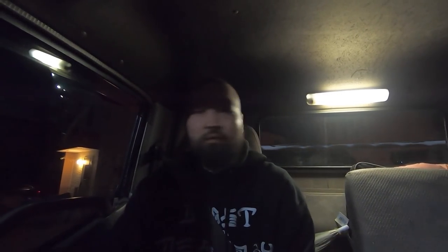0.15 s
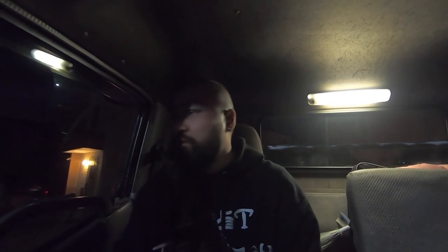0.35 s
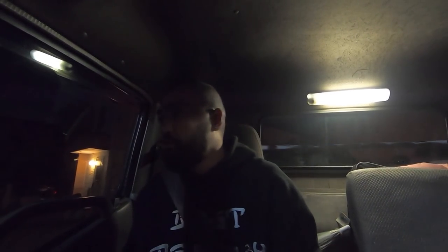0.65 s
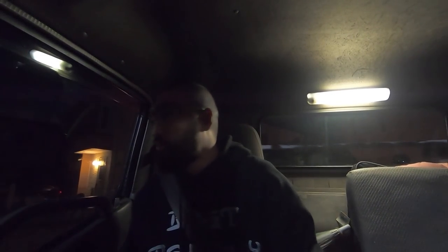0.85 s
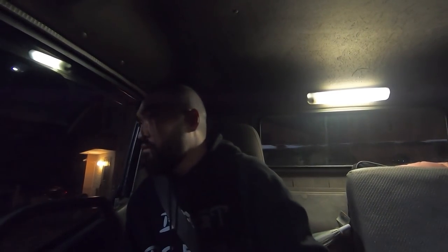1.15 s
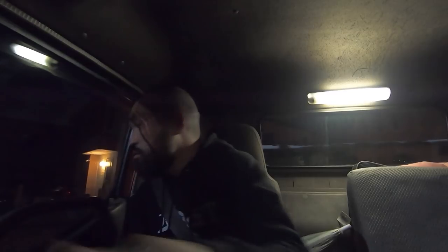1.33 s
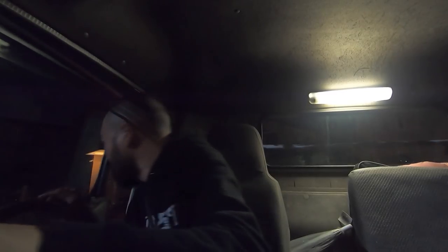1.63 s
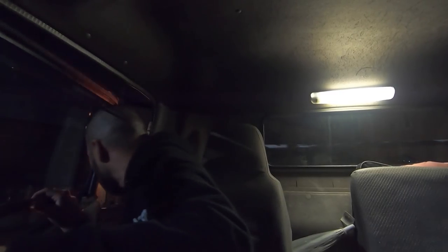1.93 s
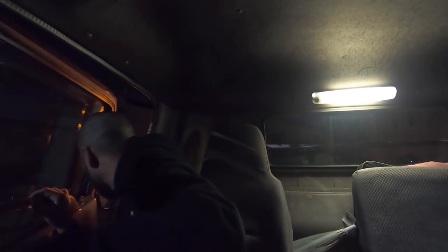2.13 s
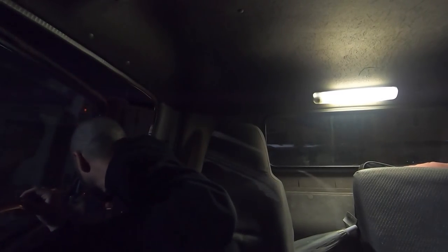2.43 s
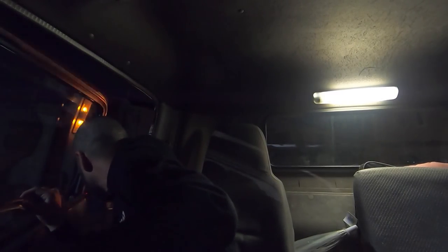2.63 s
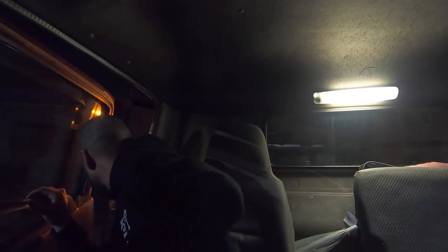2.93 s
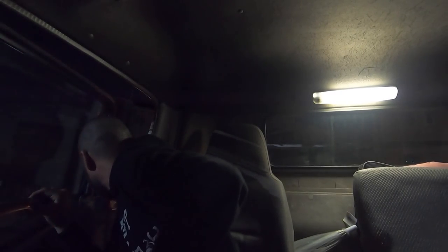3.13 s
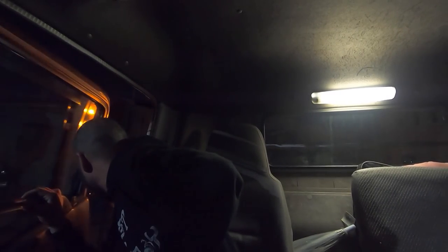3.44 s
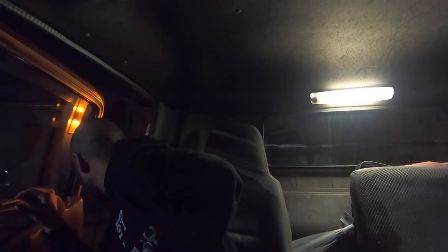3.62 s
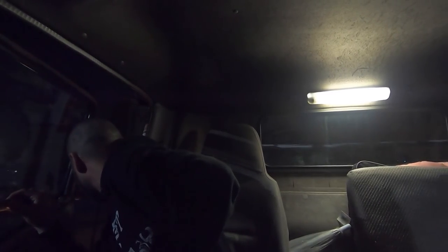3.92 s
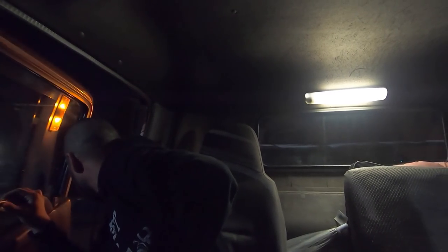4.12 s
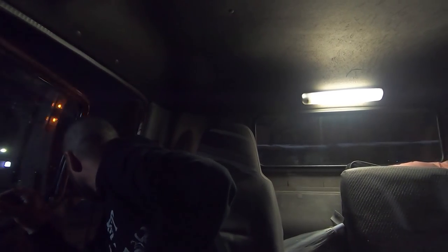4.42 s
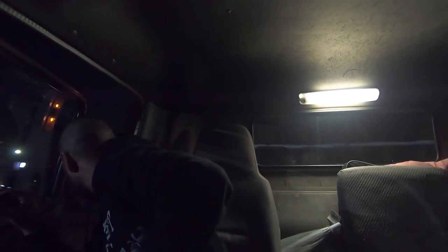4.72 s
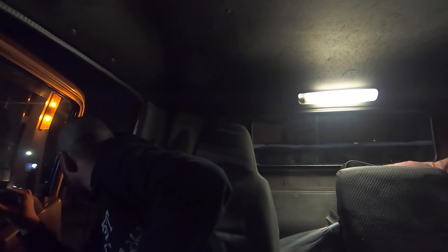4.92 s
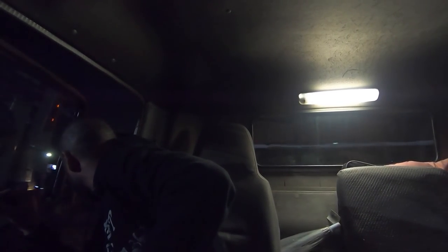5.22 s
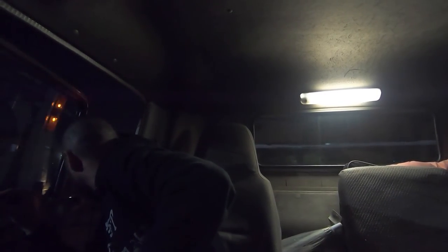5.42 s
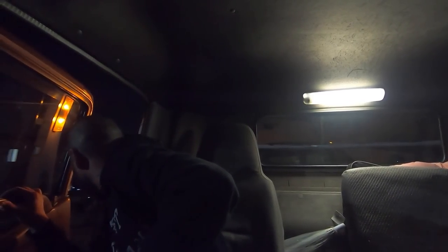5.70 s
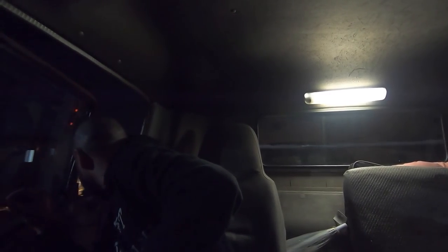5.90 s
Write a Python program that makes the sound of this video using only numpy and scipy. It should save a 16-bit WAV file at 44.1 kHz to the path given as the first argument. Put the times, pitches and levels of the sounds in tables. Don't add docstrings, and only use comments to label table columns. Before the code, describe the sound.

Close inside a truck cab, a diesel engine booms low and muffled while a flasher relay ticks and tocks evenly. The driver fumbles the door handle, the latch clunks and the door skin thumps. With the door open, clatter and valve hiss enter from the left, the revs rise and settle, loose trim rattles, and the engine finally sags into hard separate knocks.

```python
import sys
import numpy as np
from scipy import signal
from scipy.fft import rfft, irfft, next_fast_len
from scipy.io import wavfile
from scipy.ndimage import uniform_filter1d

SR = 44100
rng = np.random.default_rng(int(sys.argv[2]) if len(sys.argv) > 2 else 0)


def output_pcm(signal):
    pcm = np.clip(np.atleast_2d(signal).T, -1, 1) * 32767
    wavfile.write(sys.argv[1], SR, np.round(pcm).astype(np.int16))


def invert_db(level):
    return 10 ** (np.asarray(level, dtype=float) / 20)


N = 267246


def curve(table):
    s, *columns = np.transpose(table)
    return [np.interp(np.arange(N) / SR, s, column) for column in columns]


def over(table, hz, order=1):
    rows = np.array(table, float)
    return np.interp(np.log(hz + 1e-9), np.log(rows[:, 0]), rows[:, order])


def walk(rate):
    k = int(SR / rate)
    held = np.repeat(rng.standard_normal(N // k + 3), k)
    slewed = uniform_filter1d(uniform_filter1d(held, k), k)
    return 1.245 * slewed[k:k + N]


def add(out, s, sound):
    i = int(s * SR)
    out[:, i:i + sound.shape[1]] += sound[:, :N - i]


def lean(pan_db):
    return invert_db(np.array([[.5], [-.5]]) * pan_db)


# (f/Hz, left-right likeness -1..1, left minus right level/dB)
PORTS = [(30, 0.81, 10.5), (71.4, 0.88, -6.5), (200, 0.98, -1), (393, 0.93, -3.5), (674, 0.23, -1.5),
         (1280, 0.14, -10.5), (2400, 0.49, -3.5), (4400, 0.42, -2.5), (8000, 0.0052, -3.5),
         (15000, -0.077, 1.5)]


def at_ports(a, b, gain, balance=0.78):
    hz = np.arange(len(a) // 2 + 1) * SR / len(a)
    like = np.clip(over(PORTS, hz), -1, 1)
    tilt = invert_db(balance * over(PORTS, hz, order=2) / 2)
    same = rfft(a) * np.sqrt(1 + like)
    other = rfft(b) * np.sqrt(1 - like)
    ports = np.array([(same + other) * tilt, (same - other) / tilt])
    out = irfft(ports * gain(hz), len(a))
    return out / np.sqrt(np.mean(out.mean(axis=0) ** 2))


# (f/Hz, width f/Hz, level/dB)
RESONANCES = [(165, 29.6, 7.5), (212, 70, 4.5), (321, 17, 9), (380.4, 15, 6.5), (643, 7.5, -1.5),
              (1033, 26, 9.5), (1420, 53, -0.5), (2060, 90, 0), (2626, 90, 4), (3900, 59, 0),
              (5500, 180, 1.5), (6480, 54, 4.5)]


def colour(table, lift=0.98):
    def gain(hz):
        peaks_db = sum(db / (1 + (2 * (hz - f) / w) ** 2) for f, w, db in RESONANCES)
        inside = (hz > table[0][0]) * (hz < table[-1][0])
        return invert_db(over(table, hz) + lift * peaks_db) * inside
    return gain


def steady(table):
    return at_ports(*rng.standard_normal((2, next_fast_len(N))), colour(table, lift=0))[:, :N]


def burst(table, rise, hold, t60, tail_db):
    t = np.arange(8192) / SR - .02
    noise = at_ports(*rng.standard_normal((2, len(t))), colour(table, lift=0), balance=0)
    decay = invert_db(-60 * np.maximum(t - hold, 0) / t60)
    tail = invert_db(tail_db - 60 * t / 0.2)
    fall = (decay + tail) / (1 + invert_db(tail_db))
    return noise * np.where(t < 0, np.exp(-(t / rise) ** 2), fall)


# (f/Hz, level/dB per Hz)
SELF_NOISE = [(4000, -6), (9000, 0), (11000, -7), (13000, -11), (15000, -15), (15800, -30)]


def self_noise():
    return steady(SELF_NOISE) * invert_db(-88 + 1.5 * walk(8))


# (t/s, peak level/dB, body f/Hz,
# highs over body level/dB)
RATTLES_AND_KNOCKS = [(1.805, -28, 847, -23), (1.8045, -36, 1630, -18), (1.806, -39, 2790, -20), (1.982, -31, 1450, -22),
                      (2.176, -35.5, 1800, -20), (2.257, -33, 864, -25), (2.331, -35, 1550, -17), (2.369, -33, 1000, -19),
                      (2.459, -37, 1785, -12), (2.589, -34, 1410, -22), (2.719, -38.5, 1050, -10), (2.83, -33, 553, -40),
                      (2.859, -41, 1650, -7), (3.453, -33, 840, -21), (3.932, -35.5, 716, -19), (4.264, -40, 1350, -2),
                      (4.59, -37, 1420, -20), (4.909, -43, 1500, -14), (5.529, -42, 1320, -12), (5.673, -36, 890, -15.5),
                      (5.702, -33, 1040, -16), (5.946, -38, 1500, -23), (6.0, -40, 1460, -20), (6.043, -39, 800, -21)]
# (t/s, peak level/dB, body f/Hz, highs over body level/dB)
HANDLE = [(.514, -32, 1520, -30), (.516, -35.5, 880, -26), (0.678, -36, 844, -28), (0.908, -39, 1170, -28),
          (1.026, -37.5, 810, -23.5), (1.091, -38.5, 810, -16), (1.127, -32.5, 1620, -15),
          (1.145, -32.5, 1470, -15), (1.169, -40, 1510, -15), (1.184, -35, 1700, -17),
          (1.2065, -42, 2900, -16), (1.537, -31.5, 1130, -22), (1.541, -30, 596, -36)]


def panel_knocks(rows, pan_db):
    out = np.zeros((2, N))
    t = np.maximum(np.arange(8192) / SR - .019, 0)
    ring = (1 - np.exp(-t / 0.0018)) * invert_db(-2.5 - 60 * t / 0.067)
    for s, db, hz, high_db in rows:
        table = [(200, -30), (0.64 * hz, -14), (hz, 0), (min(1.31 * hz, 4200), -11),
                 (min(1.7 * hz, 4350), 0.67 * high_db - 1), (4500, high_db - 2.5),
                 (7000, high_db - 6.5), (9500, high_db - 10), (11000, high_db - 27.0), (16000, high_db - 46)]
        crack = burst(table, 0.0011, 0.00059, 0.064, -11)
        tone = ring * np.sin(2 * np.pi * hz * t)
        add(out, s - .019, (crack + tone) * invert_db(db - 9.0) * lean(pan_db))
    return out


# (t/s, peak level/dB)
TICKS = [(0.2578, -35), (0.9542, -35.5), (1.6506, -36.5), (2.3461, -36.5), (3.045, -37.5), (3.7439, -36.5),
         (4.4433, -37.5), (5.1437, -38.5), (5.8396, -37.5)]
# (t/s, peak level/dB)
TOCKS = [(0.6135, -34), (1.3084, -36.5), (2.0033, -34.5), (2.7057, -38), (3.4042, -36), (4.1021, -35.5),
         (4.8025, -37), (5.5004, -37.5)]
# (f/Hz, level/dB per Hz)
TICK_COLOUR = [(710, -36), (1200, -3), (1520, -20), (1830, -8), (2790, -15.5), (3020, -7.5), (3460, -6.5),
               (4010, -11), (4420, -11), (5700, -22), (6110, -14), (7080, -24.5), (7960, -10), (12500, -36),
               (16200, -58), (22000, -120)]
# (f/Hz, level/dB per Hz)
TOCK_COLOUR = [(1290, -37), (2200, -18), (2700, -14.5), (3030, -4), (3580, -3.5), (3910, -11), (4230, -6.5),
               (4620, -19), (5080, -8), (5580, -20), (6550, -9.5), (7190, -21), (8820, -12), (12500, -40),
               (16200, -60), (22000, -120)]


def relay(times, table, hold, rings):
    out = np.zeros((2, N))
    click = burst(table, 0.0016, hold, 0.058, -16.0)
    t = np.maximum(np.arange(click.shape[1]) / SR - .019, 0)
    for hz, ring_db, t60 in rings:
        swell = 1 - np.exp(-t / 0.0009)
        click = click + swell * invert_db(ring_db - 60 * t / t60) * np.sin(2 * np.pi * hz * t)
    for s, db in times:
        add(out, s - .019, click * invert_db(db - 8.0))
    return out


def flasher():
    ticks = relay(TICKS, TICK_COLOUR, 0.0031, [(3445, 11.5, 0.03), (2060, -11, 0.26)])
    tocks = relay(TOCKS, TOCK_COLOUR, 0.0038, [(3496, 12, 0.03), (3110, -6, .06), (5120, -10, .04)])
    return ticks + tocks


# (t/s of the peak, peak level/dB, rise t/s, hold t/s, t60 t/s)
LATCH = [
    (1.22, -21.5, 0.0057, 0.0052, 0.13),
    (1.271, -21, 0.0035, 0.007, 0.055),
    (1.257, -25, 0.0041, 0.0082, 0.059),
    (1.4105, -16, 0.00068, 0.012, 0.051),
]
# (f/Hz, level/dB per Hz)
LATCH_COLOURS = [
    [(260, -24), (450, -7), (617, 0.5), (919, -12), (1050, -2.5), (1310, -14), (1450, -6), (2150, -29),
     (2510, -13), (3890, -32.5), (7840, -37), (12000, -57), (15600, -88), (22000, -120)],
    [(260, -24), (450, 1), (495, -3), (1280, -7), (1410, -17), (1530, -11), (1900, -7), (2070, -17),
     (2580, -13.5), (3300, -27), (9370, -32.5), (12000, -59), (15600, -86), (22000, -120)],
    [(260, -29), (450, -6), (1280, -3), (2840, -10.5), (3490, -34), (3890, -22), (12000, -41), (15600, -76),
     (22000, -120)],
    [(290, -31), (500, -18), (659, 1), (1020, -6.5), (1360, -16.5), (1620, -8.5), (2040, -6), (2430, -12),
     (2690, -10), (2980, -16), (3810, -15), (5090, -19), (6510, -13), (8700, -15.5), (12500, -34),
     (16200, -47)],
]


def latch():
    out = np.zeros((2, N))
    for (s, db, rise, hold, t60), table in zip(LATCH, LATCH_COLOURS):
        add(out, s - .02, burst(table, rise, hold, t60, -13) * invert_db(db - 6.5) * lean(-3))
    return out


# (t/s, peak level/dB, t60
# t/s)
STRIKES = [(1.2225, -22, .02), (1.2668, -17, 0.028), (1.403, -30, .04), (1.4145, -18.5, .015),
           (1.432, -28, .03), (5.952, -37, .09), (6.002, -36, .09), (6.046, -36, .09)]
# (f/Hz, level/dB per Hz)
STRIKE_COLOUR = [(400, -18), (900, 0), (1900, 0), (2600, -6), (3800, -16), (8000, -19.5), (12000, -38),
                 (16200, -55)]


def strikes():
    out = np.zeros((2, N))
    for s, db, t60 in STRIKES:
        add(out, s - .02, burst(STRIKE_COLOUR, 0.00037, 0.00073, t60, -21) * invert_db(db - 7.0))
    return out


# (t/s of the peak, peak level/dB, f/Hz, t60 t/s, cycles to swell)
THUMPS = [(1.5, -17, 15, .25, 0.71), (1.2338, -7, 207.6, 0.06, 2.4), (1.2245, -15, 134, 0.11, 1.8),
          (1.238, -26, 430, .15, 2.5), (1.235, -30, 1230, .06, 4), (1.298, -31, 780, .05, 2.5),
          (1.312, -33, 620, .06, 2.5), (1.235, -20.5, 110, 0.34, 1.6), (1.256, -19.5, 136, 0.05, 0.54),
          (1.276, -13.5, 138, 0.097, 0.82), (1.4, -20, 222, 0.075, 1.5), (1.277, -16, 333, 0.053, 1.7),
          (1.226, -17.5, 350, 0.06, 1.4), (1.234, -22, 618, 0.047, 2), (1.271, -30, 540, 0.17, 0.97),
          (1.305, -23.5, 130, 0.22, 1.5), (1.427, -18.5, 266, 0.076, 1.1), (1.415, -24.5, 602, .05, 1.2),
          (1.422, -23, 434, 0.07, 1.2), (1.462, -22, 129, 0.14, 2.1), (1.434, -25, 330, .12, 1.5),
          (1.811, -29, 400, .06, 1.5), (.289, -18, 39, 0.17, 1.1), (.47, -20.5, 49, 0.12, 2.2)]


def thumps():
    t = np.arange(14000) / SR - .08
    out = np.zeros((2, N))
    for s, db, hz, t60, cycles in THUMPS:
        shape = np.where(t < 0, np.exp(-(t * hz / cycles) ** 2), invert_db(-60 * t / t60))
        tone = shape * invert_db(db) * np.cos(2 * np.pi * hz * t)
        add(out, s + t[0], np.array([[.95], [1.05]]) * tone)
    return out


# (t/s, extra level/dB)
HARD = [(1.849, 1.5), (1.897, 2), (2.028, 4.5), (2.0704, 5.5), (2.2954, 6), (2.395, 3), (2.483, 2.5),
        (2.526, 2), (2.9285, 1.5), (3.6139, 2), (3.771, 2), (3.9776, 2.5), (4.0559, 2.5), (4.1781, 2),
        (4.3428, 3), (4.4316, 3.5), (4.5069, 2), (4.591, 1.5), (4.6735, 1.5), (4.9085, 1.5), (4.9863, 1),
        (5.2602, 2), (5.3355, 2), (5.4457, 2), (5.893, 2.5), (5.946, 6.5), (6.0, 8), (6.042, 6)]


def hard_firings():
    rise_s, fall_s = 0.0015, 0.016
    t = np.arange(-500, 6000) / SR
    shape = np.exp(np.where(t < 0, t / rise_s, -t / fall_s))
    out = np.zeros((1, N))
    for s, db in HARD:
        add(out, s + t[0], db * shape[None])
    return out[0]


# (t/s, level/dB)
SUMP_LEVEL = [(0, -75), (1.45, -72), (1.65, -57), (2.1, -53), (2.17, -60), (2.3, -52), (2.6, -56),
              (3.3, -57), (3.8, -62), (6.06, -63)]
# (f/Hz, level/dB per Hz)
SUMP_COLOUR = [(940, -30), (1015, -12), (1046, 0), (1080, -12), (1200, -30), (1480, -18), (1580, -8),
               (1680, -18), (1800, -34)]


def sump():
    return steady(SUMP_COLOUR) * invert_db(curve(SUMP_LEVEL)[0] + .8 * hard_firings() + 2.5 * walk(20))


CYLINDER_DB = [-3, -5.5, -5, -6.5]


def knocking(turns, sharp, width):
    cycle = np.floor(turns + .5).astype(int)
    size = invert_db(np.array(CYLINDER_DB)[cycle % 4] + 1.6 * rng.standard_normal(N // 500)[cycle])
    jitter = 0.024 * rng.standard_normal(N // 500)[cycle]
    place = turns + 0.13 - np.floor(turns + .5) + jitter
    pulse = np.exp(-np.where(place < 0, place / -.09, place / width))
    return 1 - sharp + 1.85 * sharp * uniform_filter1d(size * pulse, size=220)


def firing_noise(table, turns, sharp, width, db, flicker_db, rate, hard):
    blows = knocking(turns, np.clip(sharp, 0, .95), width) * rng.standard_normal((2, N))
    padded = np.pad(blows, ((0, 0), (0, next_fast_len(N) - N)))
    ringing = at_ports(*padded, colour(table))[:, :N]
    return ringing * invert_db(db + flicker_db * walk(rate) + hard * hard_firings())


# (f/Hz, level/dB per Hz)
HISS = [(2060, -12), (3500, -5), (3820, -6.5), (5380, -9.5), (6520, -7), (7960, -7), (9190, -10),
        (9540, -12), (10200, -20), (11600, -26.5), (14700, -35), (15700, -43)]


def hiss(turns, sharp, door_db):
    return firing_noise(HISS, turns, 1.1 * sharp, .3, -54 + door_db, 1.2, 12, .35)


# (f/Hz, level/dB per Hz)
COVERS = [(500, -33.5), (720, -1.5), (800, -18), (860, -11), (990, -24.5), (1045, -3), (1100, -18),
          (1420, 3), (1500, -3.5), (1580, 1), (1690, -4), (1800, -19.5), (2080, -9.5), (2600, -35.5)]


def covers(turns, sharp, door_db):
    return firing_noise(COVERS, turns, 1.4 * sharp, .26, -49 + door_db, 1.2, 9, 1.2)


# (f/Hz, level/dB per Hz)
CLATTER = [(240, -31), (400, 0), (449, -7), (637, -9.5), (795, -9.5), (856, -6.5), (951, -12), (1020, -12),
           (1190, -11), (1410, -15.5), (1700, -13), (1850, -16), (2260, -19.5), (3530, -25), (5000, -35.5),
           (6500, -64), (11000, -120)]


def clatter(turns, sharp, door_db, rev_db):
    db = -43.5 + 0.6 * door_db + 0.21 * rev_db
    return firing_noise(CLATTER, turns, .8 * sharp, .3, db, 1.2, 14, .9)


# (f/Hz, level/dB per Hz)
RUMBLE = [(8.2, -40), (14, -9), (32, 1.5), (66, -9), (90, -8.5), (113, -10), (160, -17.5), (194, -19.5),
          (322, -23), (364, -31.5), (448, -28), (900, -39), (1170, -75.5), (1980, -120)]


def rumble(turns, sharp, door_db, rev_db):
    db = -31 + 0.015 * door_db + rev_db
    return firing_noise(RUMBLE, turns, .3 * sharp, .4, db, 1.8, 9, .1)


# (t/s, firing rate f/Hz)
SPEED = [(0, 22.36), (1, 21.2), (1.6, 20.95), (2, 22.2), (2.25, 26.76), (2.45, 31.83), (2.7, 29.53),
         (3, 27.77), (3.4, 25.93), (3.8, 24.58), (4.3, 24.1), (4.8, 24.98), (5.2, 26.05), (5.6, 26.61),
         (5.72, 25.95), (5.9, 20.47), (6.06, 20.56)]


def firing_rate():
    return curve(SPEED)[0]


# (t/s, cab boom at the firing rate level/dB)
BOOM = [(0.0, -30), (0.05, -28.5), (1.01, -34.5), (1.25, -25), (1.28, -34), (1.62, -34), (1.65, -27),
        (2.55, -16.5), (3.19, -27), (3.39, -15.5), (3.56, -23), (4.72, -22.5), (4.84, -45), (4.94, -19.5),
        (5.69, -19), (5.94, -30.5), (5.99, -23.5), (6.06, -30)]
# (order, f/Hz, width f/Hz, level/dB at the centre, level/dB gained by the open door)
CAB_MODES = [(2, 46.1, 9.4, -27, 4), (4, 98, 6.9, -31, -6)]
# (t/s, length t/s, boom level/dB, second order level/dB, fourth order level/dB)
ROCKING = [(.6, .06, -3, -2, -1), (1.42, .06, -7, 1, -2), (1.997, 0.098, 0.5, 3, -8),
           (2.217, 0.059, -2.1, -10, 1), (2.43, 0.032, -2.5, 0.1, 7), (2.51, 0.032, 2.5, -2, -1),
           (2.917, 0.045, 5, -3, 0.1), (3.5, 0.047, 1.5, 1, -4), (3.62, 0.05, -2.5, 2, 1),
           (3.8, .05, 3, 1, -2.7), (4.222, 0.032, -0.5, -0.5, -3.5), (4.295, .05, 3.5, 2, -1.5),
           (4.36, .05, -5.5, -4, -13), (4.55, 0.037, 0.5, -10, 2.5), (4.688, .04, 5, -5, 2.1),
           (4.78, .05, -1, -12, 0.5), (5.074, .05, 1.5, -3, -11), (5.2, 0.034, -1, 2, 4),
           (5.37, 0.041, -1.2, -6, -5), (5.6, 0.067, -0.5, -9, -3)]


def boom(turns, door_db, rest_db):
    hz = firing_rate()
    own = {1: curve(BOOM)[0]}
    for k, f, width, db, open_db in CAB_MODES:
        mode_db = -10 * np.log10(1 + (2 * (k * hz - f) / width) ** 2)
        own[k] = db + 0.29 * (rest_db + 30.5) + open_db * door_db / 20 + mode_db
    s, length, *rock_db = np.transpose(ROCKING)
    t = np.arange(0, N + 256, 256) / SR
    sway = np.exp(-((t[:, None] - s) / length) ** 2)
    for k, db in zip(own, rock_db):
        own[k] = own[k] + np.interp(np.arange(N) / SR, t, sway @ db)

    out = 0
    for k in np.arange(1, 35) / 2:
        if k < 2:
            db = (-43, -22.5)[int(k)]
        else:
            db = -29 - 9.5 * (k % 1 > 0) - 0.4 * abs(k - 7)
        loose = 0 if k == 1 else .45 if k in own else 1
        start = .66 if k == 1 else rng.random()
        lag = start + loose * (0.076 + .012 * k) * walk(4)
        panel_db = 0
        if k > 8.5:
            panel_db = sum(10.9 / (1 + ((k * hz - f) / 14) ** 2) for f in (282, 322, 392)) - 6
        size_db = own[k] if k in own else rest_db + db + 7.5 + panel_db
        out = out + invert_db(size_db + 2.9 * loose * walk(7)) * np.cos(2 * np.pi * (k * turns + lag))
    return np.sqrt(2) * out * lean(1.5 + 0.14 * door_db)


# (t/s, level/dB under wide open)
DOOR = [(0.08, -17), (.3, -21), (1.0, -21.5), (1.31, -13), (1.55, -9), (2.01, -2), (2.26, -3.5),
        (2.43, -2.5), (2.7, -4.5), (3.5, -2.5), (4.1, -1.5), (5.04, 0), (5.4, -2.5), (5.62, -2), (5.81, -6),
        (6.06, -3)]
# (t/s, other orders level/dB, sharpness of the knock 0-1)
STRAIN = [(0, -42, 0.24), (1.3, -37, 0.06), (1.9, -39, 0.51), (2.4, -42, 0.42), (3.0, -35.5, 0.39),
          (3.5, -35, 0.54), (4.2, -30, 0.58), (5.3, -32, 0.51), (5.72, -31, 0.38), (5.82, -42.5, 0.45),
          (6.06, -35, 0.29)]


def engine():
    hz = firing_rate()
    turns = np.cumsum(hz) / SR + .472
    rest_db, sharp = curve(STRAIN)
    door_db = curve(DOOR)[0]
    slope = np.gradient(hz) * SR
    climb_db = 0.1785 * uniform_filter1d(np.maximum(slope, 0), int(0.1 * SR))
    lift_db = 0.06 * uniform_filter1d(np.minimum(slope, 0), size=2000)
    rev_db = climb_db + lift_db
    out = hiss(turns, sharp, door_db) + covers(turns, sharp, door_db)
    out = out + clatter(turns, sharp, door_db, rev_db) + rumble(turns, sharp, door_db, rev_db)
    return out + boom(turns, door_db, rest_db)


def scene():
    knocks = panel_knocks(RATTLES_AND_KNOCKS, -4.5) + panel_knocks(HANDLE, -3)
    door = latch() + strikes() + thumps()
    return self_noise() + knocks + flasher() + door + sump() + engine()


def top_cut(x):
    return signal.sosfilt(signal.butter(12, 16480, fs=SR, output="sos"), x)


def record(dry):
    return top_cut(dry)


dry = scene()
out = record(dry)
output_pcm(out)
```